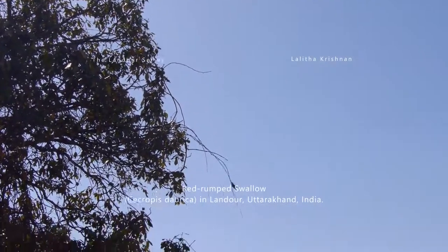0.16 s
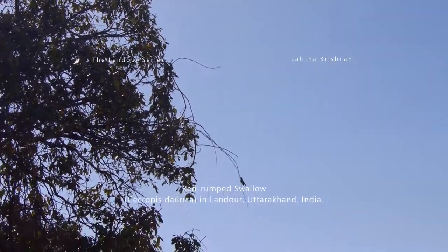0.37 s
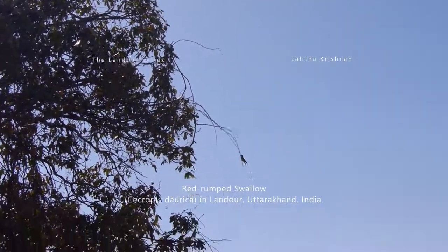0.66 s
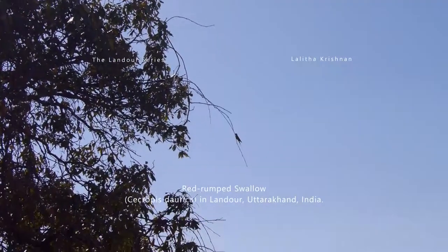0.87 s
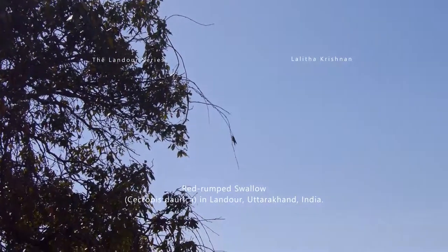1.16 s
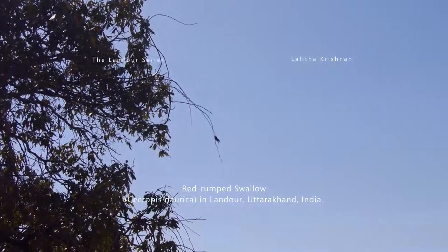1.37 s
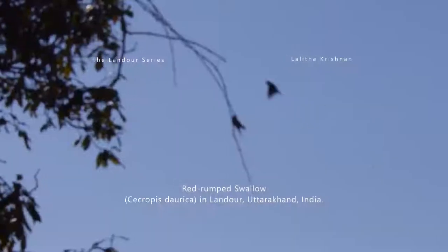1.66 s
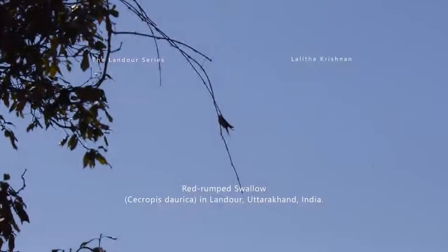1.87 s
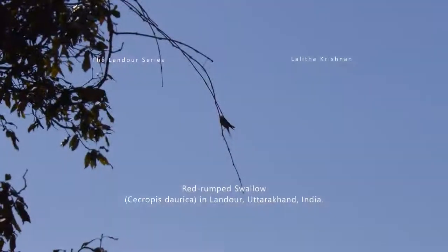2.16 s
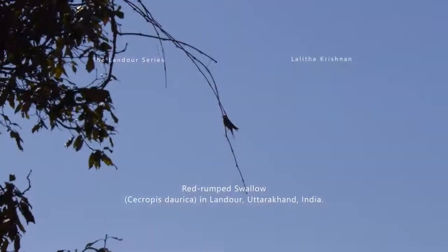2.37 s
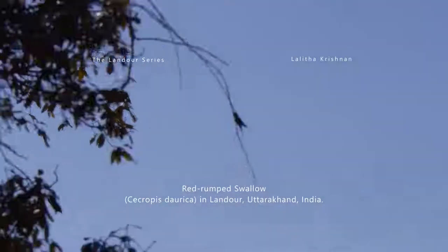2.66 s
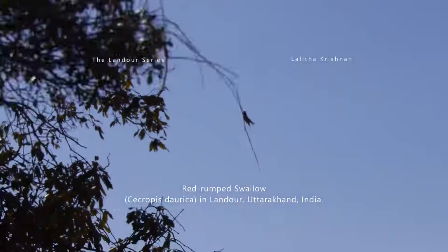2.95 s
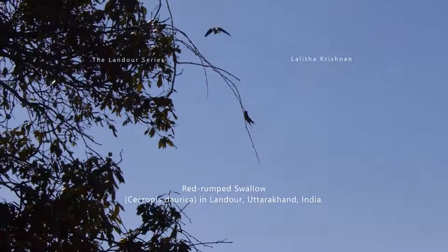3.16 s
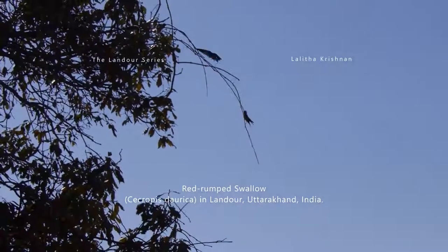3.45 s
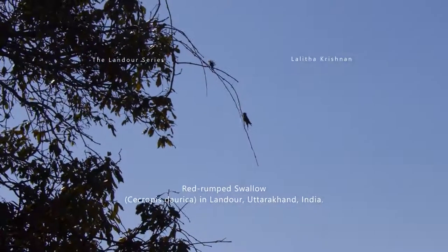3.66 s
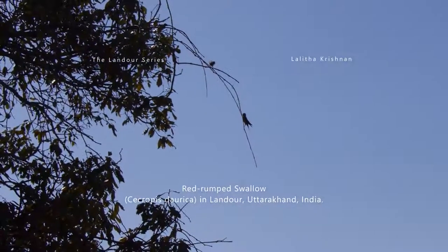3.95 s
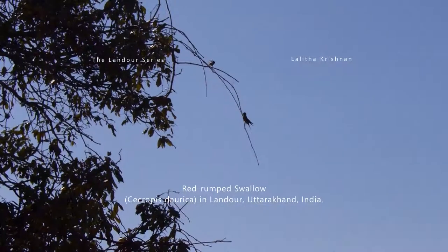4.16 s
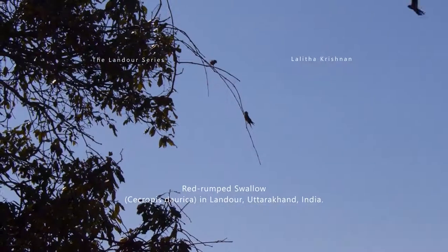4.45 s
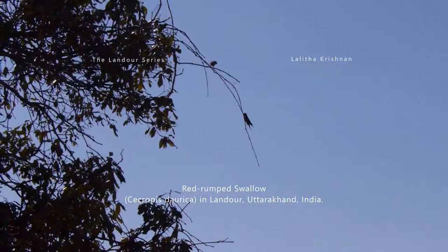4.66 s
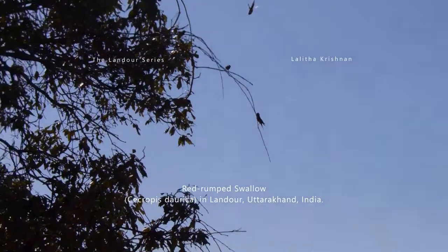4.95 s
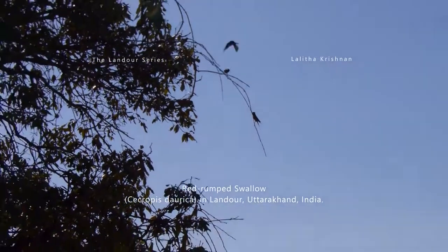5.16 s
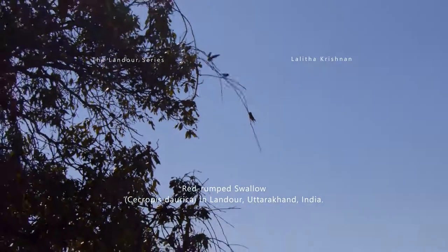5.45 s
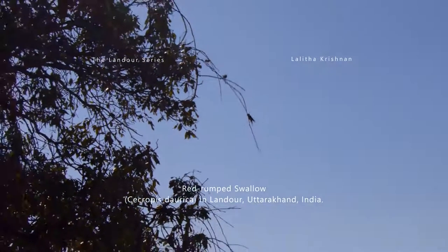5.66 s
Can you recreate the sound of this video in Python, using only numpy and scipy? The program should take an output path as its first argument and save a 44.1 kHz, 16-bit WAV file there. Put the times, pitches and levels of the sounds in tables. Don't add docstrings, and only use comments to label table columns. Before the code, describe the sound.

Swallows twitter outdoors in rough, quick double chirps and hoarse rising whines, with fainter birds, soft twig ticks and a low distant hum.

```python
import sys
import numpy as np
from scipy import signal
from scipy.fft import rfft, irfft, next_fast_len
from scipy.io import wavfile
from scipy.ndimage import uniform_filter1d, map_coordinates

SR = 44100
rng = np.random.default_rng(int(sys.argv[2]) if len(sys.argv) > 2 else 0)


def gain_from_db(level_db):
    decades = np.asarray(level_db, float) / 20
    return 10 ** decades


def materialize(psi):
    bounded = np.clip(np.atleast_2d(psi).T, -1, 1)
    quanta = np.round(bounded * 32767).astype(np.int16)
    wavfile.write(sys.argv[1], SR, quanta)


N = 256654
T = np.arange(N) / SR


def along(points, hz):
    f, v = np.transpose(points)
    return np.interp(np.log(hz + 1), np.log(f + 1), v)


def curves(rows):
    s, *cols = np.transpose(rows)
    return [np.interp(T, s, c) for c in cols]


def unit(x):
    return x / np.sqrt(np.mean(np.abs(x) ** 2) + 1e-20)


def wobble(rate_hz):
    coarse = T[::4]
    knots = rng.standard_normal(int(N * rate_hz / SR) + 4)
    return np.interp(T, coarse, map_coordinates(knots, [coarse * rate_hz]))


def filtered(x, response):
    m = next_fast_len(N + 8192)
    return irfft(rfft(x, m) * response(np.fft.rfftfreq(m, 1 / SR)), m)[..., :N]


def flutter(rough, rate_hz):
    share = np.clip(rough, 0, 1)
    return np.sqrt(1 - share) + np.sqrt(share / 2) * (wobble(rate_hz) + 1j * wobble(rate_hz))


def rush(spectrum, alike, patchy_db):
    z = signal.stft(rng.standard_normal((2, N)), nperseg=512)[2]
    field = uniform_filter1d(rng.standard_normal(z.shape[1:]), size=5, axis=0)
    field = uniform_filter1d(field, size=8, axis=1)
    pair = signal.istft(z * gain_from_db(patchy_db * unit(field)), nperseg=512)[1][:, :N]

    def mid_side(hz):
        turn = np.arccos(np.clip(along(alike, hz), -1, 1)) / 2
        shape = gain_from_db(along(spectrum, hz)) * (hz > spectrum[0][0]) * (hz < spectrum[-1][0])
        return shape * [np.cos(turn), np.sin(turn)]

    mid, side = filtered(pair, mid_side)
    return unit(np.array([mid + side, mid - side]))


def rasp():
    # [f/Hz, density/dB]
    air_spectrum = [(1500, -0.5), (2500, 9.5), (3500, 11), (5000, 4.5), (6500, -12.5), (8000, -15.5),
                    (11000, -15.5), (15500, -36)]
    return unit(filtered(rng.standard_normal(N), lambda hz: gain_from_db(along(air_spectrum, hz)) * (hz > 1200)))


def shaped(rows, shape):
    calls = []
    for s, length_s, start_hz, end_hz, db in rows:
        span_hz = end_hz - start_hz
        calls.append([(s + u * length_s, start_hz + glide * span_hz, db + swell_db)
                      for u, glide, swell_db in shape])
    return calls


def sung(calls, edge_s):
    gate = 0
    for c in calls:
        inside_s = np.minimum(T - c[0][0] + edge_s, c[-1][0] + edge_s - T)
        gate = gate + np.clip(inside_s / (2 * edge_s), 0, 1)
    hz, *levels_db = curves(np.concatenate(calls))
    return 2 * np.pi * np.cumsum(hz) / SR, [np.sqrt(2) * gain_from_db(db) * gate for db in levels_db]


def glides(table, shake):
    out = np.zeros(N + SR)
    for s, length_s, start_hz, end_hz, db in table:
        u = np.linspace(0, 1, round(length_s * SR))
        tone = np.exp(2j * np.pi * np.cumsum(start_hz + (end_hz - start_hz) * u) / SR)
        at = round(s * SR)
        swell = np.sin(np.pi * u) ** .7
        out[at:at + len(u)] += gain_from_db(db + 4) * swell * (tone * shake[at:at + len(u)]).real
    return out[:N]


def background():
    # [t/s, level/dB]
    valley_levels = [(0, -61.5), (.61, -58.5), (.9, -60.5), (2.3, -59.5), (2.77, -54.5), (3.73, -57),
                     (4.05, -58.5), (4.7, -57.5), (5.4, -59.5), (5.82, -59)]
    flock_levels = [(0, -56), (.61, -66), (1.05, -65.5), (1.3, -64.5), (2.43, -63), (2.77, -51),
                    (3.73, -65), (4.05, -61.5), (4.7, -58), (4.97, -50), (5.17, -62), (5.41, -59),
                    (5.82, -56.5)]
    # [f/Hz, density/dB]
    valley_spectrum = [(59, -29), (100, -7), (146, -1), (385, -1.5), (1310, -6), (2500, -11.5), (3250, -44),
                       (5500, -120)]
    flock_spectrum = [(880, -116), (1500, -2.5), (2200, -2.5), (3020, 5.5), (4970, -3.5), (7500, -19),
                      (9750, -75), (16500, -120)]
    leaf_spectrum = [(3530, -23), (6000, -2), (7060, -4.5), (12500, -10.5), (14500, -14), (15500, -20)]
    wind_spectrum = [(12, -37), (20, 4), (32, -10), (65, -1), (170, -8.5), (220, -6), (370, -120)]
    # [f/Hz, left-right likeness]
    likeness = [(60, 1), (240, 0.8), (950, 0.59), (3770, 0.71), (15000, 0.46)]
    leaves_mean_db, leaves_swing, breeze_db = -73.5, 1, -71.5
    (valley_db,), (flock_db,) = curves(valley_levels), curves(flock_levels)
    leaves_db = leaves_mean_db + leaves_swing * (valley_db - valley_db.mean())
    hum = gain_from_db(valley_db + 0.89 * wobble(2.608)) * rush(valley_spectrum, likeness, patchy_db=1.5)
    flock = gain_from_db(flock_db + 1.5 * wobble(12)) * rush(flock_spectrum, likeness, patchy_db=2)
    leaves = gain_from_db(leaves_db + .7 * wobble(8)) * rush(leaf_spectrum, likeness, patchy_db=1.2)
    wind = gain_from_db(breeze_db + 1.5 * wobble(4.0)) * rush(wind_spectrum, [(40, 0.66)], patchy_db=1.0)
    return hum + flock + leaves + wind + gusts()


def pips():
    # [t/s, length/s, f/Hz, level/dB]
    pip_calls = [(0.0, 0.012, 3735, -32), (1.814, 0.046, 2973, -49.5), (1.838, 0.023, 3670, -57.5),
                 (1.824, 0.025, 1490, -59), (2.11, 0.019, 2050, -48), (2.156, 0.022, 2060, -53.5),
                 (2.38, 0.031, 2330, -58.5), (2.778, 0.027, 3250, -50), (2.837, 0.034, 3875, -54.5),
                 (3.234, 0.055, 4200, -65), (4.671, 0.026, 2395, -55.5), (4.703, 0.017, 2370, -46),
                 (4.836, 0.016, 2254, -49), (4.854, 0.022, 5060, -60), (4.904, 0.017, 2830, -39),
                 (5.051, 0.023, 1800, -56), (5.171, 0.018, 2415, -54.5), (5.192, .02, 3425, -60),
                 (5.222, 0.019, 1772, -58), (5.226, 0.025, 2085, -63), (5.447, 0.03, 2345, -51),
                 (5.717, 0.016, 2428, -53.5)]
    lift = 0.0045
    rows = [(s, length_s, hz * (1 - lift), hz * (1 + lift), db) for s, length_s, hz, db in pip_calls]
    return glides(rows, flutter(rough=.4, rate_hz=200))


def rustle():
    # [t/s, length/s, level/dB]
    air_puffs = [(0.0, 0.03, -47), (.1, 0.15, -50.5), (1.361, 0.024, -50.5), (1.535, 0.062, -49.5),
                 (1.749, 0.11, -55.5), (1.97, 0.11, -54), (2.512, 0.074, -54), (3, 0.083, -52.5),
                 (3.77, 0.077, -50.5), (4.098, 0.13, -54.5), (4.957, .012, -60)]
    gain = 0
    for s, length_s, db in air_puffs:
        u = (T - s) / length_s
        gain = gain + gain_from_db(db) * np.clip(6 * u, 0, 1) * np.sqrt(np.clip(1 - u, 0, 1))
    return gain * gain_from_db(2.5 * wobble(150)) * rasp()


def chirps(calls):
    # [multiple of sung pitch, level/dB]
    partials = [(.5, -18), (1.5, -7), (2, -22), (2.5, -31), (3, -28)]
    # [t/s, overtone level/dB]
    facing = [(0, -14), (.12, -3), (.3, -12), (1.36, -27), (1.8, -10), (2.05, -17), (2.5, -12),
              (3.15, -12.5), (3.3, -2.5), (3.75, -21.5), (4.1, 6.5), (4.3, -19), (4.9, -10), (5.6, -6)]
    air_facing_db, air_turns = 12.5, 0.44
    drooping = [list(c) + [(c[-1][0] + .012, .7 * c[-1][1], c[-1][2] - 6)] for c in calls]
    phase, (gain,) = sung(drooping, edge_s=.003)
    gain = gain_from_db(7.5) * gain
    effort = np.clip(gain / gain_from_db(-41), .3, 1)
    beat = 2 * np.pi * np.cumsum(185 * (1 + 0.18 * wobble(40))) / SR
    throb = 1 + .75 * effort * np.cos(beat)
    main = flutter(rough=.3 * effort, rate_hz=520) * np.exp(1j * phase)
    overtones = sum(gain_from_db(db) * np.exp(1j * k * phase) for k, db in partials)
    overtones = flutter(rough=.4 + .4 * effort, rate_hz=800) * overtones
    overtone_db, = curves(facing)
    air_db = air_facing_db + air_turns * overtone_db
    flow = uniform_filter1d(gain, size=1500)
    air = gain_from_db(air_db - 22.0) * flow * rasp()
    return gain * (throb * main.real + gain_from_db(overtone_db) * overtones.real) + air


def rises():
    # [t/s, length/s, start f/Hz, end f/Hz, level/dB]
    rise_calls = [(.055, 0.049, 2093, 3160, -56.5), (.19, .068, 2320, 3500, -51.5),
                  (.525, .073, 2256, 3760, -48.5), (1.36, 0.069, 2147, 3800, -47.5),
                  (1.775, 0.051, 2630, 3900, -61.5), (2.535, 0.06, 2300, 3607, -44.5),
                  (2.7, 0.066, 2737, 3860, -51), (3.04, .067, 2067, 3710, -42),
                  (3.255, .1, 2053, 3293, -58.5), (3.79, 0.071, 2130, 3628, -44.5),
                  (4.05, .052, 2093, 3192, -61.5), (4.29, .072, 2260, 3550, -49.5),
                  (4.745, 0.077, 2147, 3433, -50), (4.855, 0.05, 2930, 3540, -50),
                  (5.04, 0.074, 2004, 3369, -48.5), (5.35, 0.084, 2117, 3543, -52),
                  (5.775, 0.077, 1976, 3595, -50)]
    # [share of length, share of glide, level/dB]
    rise_shape = [(0, 0.019, -17), (.25, .3, -7), (.5, .62, -0.5), (.75, .89, -2), (1, 0.98, -1.5)]
    return chirps(shaped(rise_calls, rise_shape))


def drones():
    # [t/s, length/s, start f/Hz, end f/Hz, level/dB]
    engines = [
        (.1, 1.21, 392, 380.4, -69),
        (2.25, 0.5, 160.5, 162, -66.5),
        (2.8, 1.6, 1111, 1235, -66),
        (3.3, 0.48, 371, 379, -73),
    ]
    return glides(engines, flutter(rough=.9, rate_hz=70))


def flicks():
    # [t/s, length/s, start f/Hz, end f/Hz, level/dB]
    flick_calls = [(.112, 0.043, 2200, 3745, -55.5), (.16, 0.029, 2268, 3900, -51),
                   (0.261, 0.065, 2723, 3990, -53.5), (.603, 0.057, 2900, 4110, -53.5),
                   (1.437, 0.035, 2898, 4130, -48), (1.539, 0.036, 2700, 4005, -45.5),
                   (2.602, 0.04, 2797, 4097, -46), (2.775, 0.037, 3308, 4424, -55),
                   (3.112, 0.04, 2553, 4080, -45.5), (3.862, 0.047, 2735, 4050, -44.5),
                   (4.108, 0.045, 2330, 3940, -57), (4.163, 0.041, 3410, 4060, -64.5),
                   (4.366, 0.032, 2545, 4083, -52), (4.82, 0.033, 2505, 4132, -52),
                   (4.91, 0.055, 2810, 4310, -51.5), (5.11, 0.039, 2505, 3872, -48),
                   (5.435, 0.036, 2680, 4220, -51)]
    # [share of length, share of glide, level/dB]
    flick_shape = [(0, 0.019, -0.5), (0.499, .72, -0.5), (1, 0.99, -5)]
    return chirps(shaped(flick_calls, flick_shape))


def wheezes():
    # [t/s, upper voice f/Hz, level/dB, lower over upper/dB]
    voices = [
        [(.18, 3852, -41, -22), (.192, 4043, -44.5, -5), (.26, 4110, -40, -24), (.4, 4005, -52.5, 9.5),
         (.47, 3885, -49.5, -7), (.655, 3771, -50, 5), (.799, 3597, -50, -3), (.815, 3460, -65, -10)],
        [(2.93, 3936, -59.5, -1), (2.992, 3770, -56, 1), (3.03, 3842, -52.5, -10)],
        [(4.28, 3813, -77, 19.5), (4.35, 3956, -59, 5), (4.39, 3976, -60, -5), (4.45, 3915, -57, -5),
         (4.602, 3760, -76.5, 13), (4.698, 3670, -61, -3), (4.76, 3570, -76, 0)],
        [(5.415, 3005, -68, 25), (5.446, 3240, -69.5, 23), (5.47, 3365, -45, -4.5), (5.57, 3680, -55, 6.5),
         (5.624, 3770, -46.5, 6), (5.66, 3920, -49, -0.5), (5.695, 3840, -50.5, -3), (5.72, 3850, -48, -11),
         (5.819, 3830, -54.5, 14.5)],
    ]
    # [lower over upper pitch, coupling/dB]
    couplings = [(.858, -2), (.805, -4), (.862, -5), (.818, -8)]
    # [upper multiple, lower multiple, level/dB]
    sum_tones = [(.5, 0, -11), (1.5, 0, -22), (2, 0, -31), (2.5, 0, -32), (0, 2, -28), (.5, 1, -13),
                 (2, -1, -11), (-.5, 2, -21), (1, 1, -30), (0, 3, -35)]
    warm_db, warm_s = -14, .2
    upper, lower, strain = [], [], []
    for c, (ratio, coupling_db) in zip(voices, couplings):
        upper.append([p[:3] for p in c])
        lower.append([(s, ratio * hz, db + over_db) for s, hz, db, over_db in c])
        for p in c:
            cold = max(0, 1 - (p[0] - c[0][0]) / warm_s)
            strain.append((p[0], coupling_db + warm_db * cold))
    up, (up_gain,) = sung(upper, edge_s=0.015)
    low, (low_gain,) = sung(lower, edge_s=0.0073)
    strain_db, = curves(strain)

    def tone(phase, rough):
        return (flutter(rough, rate_hz=120) * np.exp(1j * phase)).real

    both = uniform_filter1d(up_gain, size=4000) * uniform_filter1d(low_gain, size=4000)
    both = np.sqrt(np.abs(both)) * (up_gain > 0)
    mixed = 0
    for a, b, db in sum_tones:
        follow = -.5 if (a, b) == (0, 2) else 1
        gain = gain_from_db(db + 3 * wobble(22) + follow * strain_db)
        mixed = mixed + gain * tone(a * up + b * low, rough=.6)
    return up_gain * tone(up, rough=.33) + low_gain * tone(low, rough=.35) + both * mixed


def arch(count):
    settle, bend, creep = .27, 1.3, .12
    swell_db, swell = -7.5, 0.18
    u = np.linspace(0, 1, count)
    glide = (1 - creep) * (1 - np.exp(-(u / settle) ** bend)) + creep * u
    return np.transpose([u, glide, swell_db * np.exp(-u / swell)])


def whines():
    # [t/s, length/s, start f/Hz, end f/Hz, level/dB]
    whine_calls = [
        (.19, 0.34, 2070, 3323, -52),
        (1.005, 0.36, 2060, 3312, -51.5),
    ]
    third_db, fade_db, late = 2.5, -12.5, 1.9
    calls = []
    for c in shaped(whine_calls, arch(count=25)):
        start_s, end_s, end_db = c[0][0], c[-1][0], c[-1][2]
        calls.append([(s, hz, db, db + third_db + late * (db - end_db)
                       + fade_db * (s - start_s) / (end_s - start_s)) for s, hz, db in c])
    phase, (second, third) = sung(calls, edge_s=0.004)

    def tone(k):
        return (flutter(rough=.5, rate_hz=450) * np.exp(1j * k * phase)).real

    upper = tone(1.5) + gain_from_db(-14) * tone(2) + gain_from_db(-36) * tone(2.5) + gain_from_db(-30) * tone(3)
    return second * (tone(0.99) + gain_from_db(-17.5) * rasp()) + gain_from_db(3.0) * third * upper


def twigs():
    # [t/s, peak/dB]
    ticks = [
        (0.594, -31),
        (1.427, -30),
        (2.707, -30),
        (2.937, -36.5),
        (3.179, -39),
        (3.425, -36.5),
        (3.549, -36.5),
        (3.673, -35),
    ]
    # [f/Hz, width/Hz, level/dB]
    modes = [(410, 46, -4.5), (716, 56, 3.5), (1800, 206, 4)]
    blows = np.zeros(N)
    for s, db in ticks:
        blows[round(s * SR)] = gain_from_db(db + 24.0)

    def wood(f):
        total = 0
        for k, (c, w, db) in enumerate(modes):
            total = total + (-1) ** k * gain_from_db(db) * 1j * f * w / (c * c - f * f + 1j * f * w)
        return total / (1 + 1j * f / 3000) ** 2

    return filtered(blows, wood)


def whistles():
    # [t/s, length/s, start f/Hz, end f/Hz, level/dB]
    whistle_calls = [ (.82, 0.11, 3040, 2775, -66.5), (.95, 0.047, 2570, 2550, -65.5),
                     (1.755, 0.034, 4550, 5150, -65), (2.018, 0.026, 3550, 2725, -41),
                     (2.03, 0.049, 3450, 3270, -52), (2.52, 0.056, 3900, 5930, -59),
                     (2.055, 0.039, 2880, 2620, -55), (2.475, 0.042, 1726, 2095, -56.5),
                     (3.19, 0.088, 5200, 5225, -63), (3.27, .06, 5200, 5940, -65),
                     (3.32, 0.063, 6560, 6630, -63), (3.455, 0.11, 5220, 4970, -59),
                     (3.55, 0.082, 4740, 5250, -63), (3.4, .06, 6500, 6440, -76),
                     (3.7, 0.2, 6370, 6540, -67.5), (3.715, .058, 5500, 5460, -68),
                     (3.93, 0.088, 5100, 5260, -60), (3.96, 0.089, 5720, 5870, -70),
                     (4.02, .051, 4576, 4160, -62), (4.13, 0.046, 2110, 2248, -60),
                     (4.2, .12, 6780, 6520, -68), (4.35, 0.13, 5160, 4930, -58),
                     (4.59, .13, 6450, 6380, -65), (4.69, .086, 5020, 4750, -62.5)]
    return glides(whistle_calls, flutter(rough=.7, rate_hz=260))


def snaps():
    # [t/s, peak/dB]
    clicks = [(1.5409, -65), (3.2509, -61), (3.4271, -62), (3.587, -63), (3.781, -66), (3.8277, -56),
              (3.9754, -64), (4.6763, -59), (4.9586, -54), (4.9856, -59)]
    # [t/s, length/s, level/dB]
    hisses = [
        (2.501, 0.19, -79),
        (3.429, 0.083, -72),
        (4.958, 0.041, -68),
        (5.492, 0.074, -71),
    ]
    # [f/Hz, density/dB]
    bright = [(5000, -30), (7500, 4), (11000, 3), (15500, -9)]
    gain = np.zeros(N)
    for s, length_s, db in hisses:
        ramp = np.interp(T, [s, s + 0.16 * length_s, s + length_s], [0, 1, 0])
        gain += gain_from_db(db) * np.sqrt(ramp)
    for s, db in clicks:
        gain[round(s * SR):][:200] += gain_from_db(db + 1.5 - 60 * T[:200] / .004)
    return gain * unit(filtered(rng.standard_normal(N), lambda hz: gain_from_db(along(bright, hz))))


def gusts():
    # [t/s, level/dB]
    thumps = [
        (1.94, -63),
        (2.19, -66),
        (3.865, -54),
        (4.4, -64),
        (5.24, -67),
    ]
    half_width_s, port_hz = 0.039, 88.3
    bells = sum(gain_from_db(db) * np.exp(-((T - s) / half_width_s) ** 2) for s, db in thumps)
    return bells * (flutter(rough=.4, rate_hz=60) * np.exp(2j * np.pi * port_hz * T)).real


def chips():
    # [t/s, peak/dB, f/Hz]
    strokes = [(1.991, -39, 3960), (2.0062, -40.5, 4780), (2.206, -43, 2540), (2.243, -48, 3170),
               (2.302, -46, 2690), (2.328, -45, 2610), (2.356, -52, 2510), (2.427, -41, 2730),
               (4.555, -45.5, 5020), (4.7705, -43, 4970), (5.257, -85, 5070), (5.287, -50, 4820),
               (5.3043, -43.5, 4700), (5.3254, -72, 4790), (5.3438, -63, 4790), (5.3542, -49, 4880),
               (5.5167, -47, 5040)]
    out, u = np.zeros(N + SR), np.linspace(0, 1, 640)
    shake = flutter(rough=0.91, rate_hz=1200)
    for s, db, hz in strokes:
        tone = np.exp(2j * np.pi * np.cumsum(hz * (1.05 - 0.096 * u)) / SR)
        at = round(s * SR)
        out[at:at + len(u)] += gain_from_db(db - 5.5) * np.sin(np.pi * u) * (tone * shake[at:at + len(u)]).real
    return out[:N]


def slope(x):
    # [f/Hz, t60/s]
    decay = [(1500, 0.15), (4000, 0.23), (10000, 0.045)]
    hz, t, z = signal.stft(rng.standard_normal((2, SR // 2)), SR, nperseg=256)
    fading = z * gain_from_db(-60 * t / along(decay, hz)[:, None])
    mid, side = signal.istft(fading, SR, nperseg=256)[1]
    tail = np.array([mid + 0.31 * side, mid - 0.61 * side])
    tail = tail / np.linalg.norm(tail[0])
    return signal.fftconvolve(np.pad(x, (150, 0))[None], tail, axes=1)[:, :N]


def scene():
    # [t/s, left minus right/dB]
    place = [(0, -0.5), (.32, 4), (.92, 4), (1.0, 2.5), (2.79, 1.5), (4.0, 3), (5.82, 1.5)]
    near = rustle() + rises() + flicks() + wheezes() + whines()
    near = near + gain_from_db(-9) * np.pad(near, (390, 0))[:N]
    far = pips() + whistles() + chips()
    pan_db = curves(place)[0] / 2
    direct = (near + far) * gain_from_db([pan_db, -pan_db]) + drones() + twigs() + snaps()
    return direct + slope(gain_from_db(-10.5) * near + gain_from_db(-7) * far) + background()


def band_limit(x):
    return signal.sosfilt(signal.butter(12, 15610, fs=SR, output="sos"), x)


def record(dry):
    mix = filtered(dry, lambda hz: hz < 15600)
    return band_limit(mix)


dry = scene()
out = record(dry)
materialize(out)
```